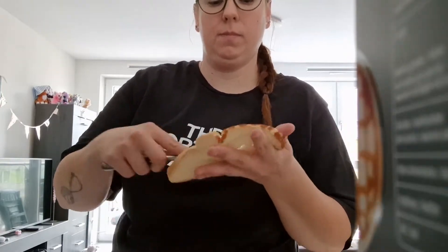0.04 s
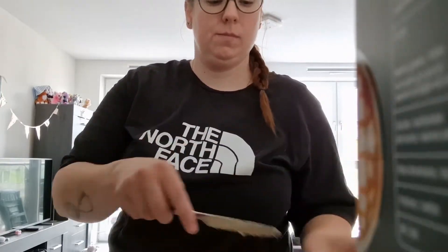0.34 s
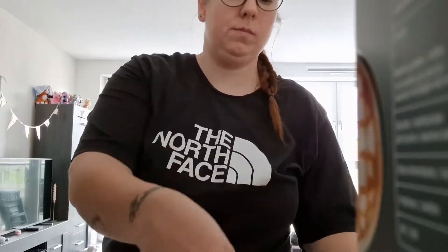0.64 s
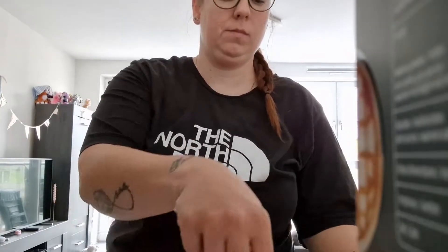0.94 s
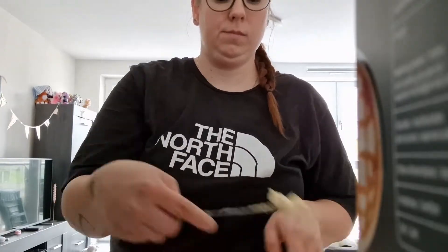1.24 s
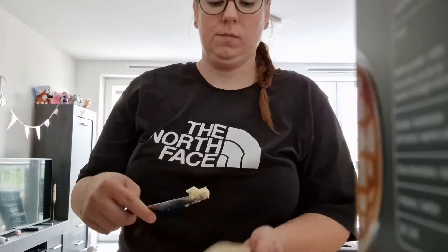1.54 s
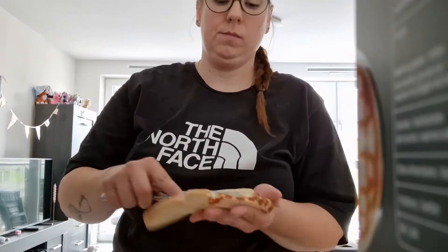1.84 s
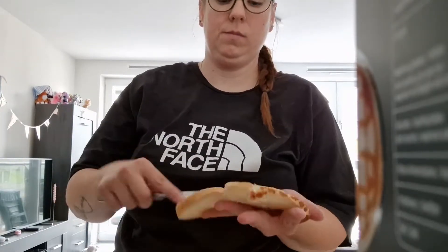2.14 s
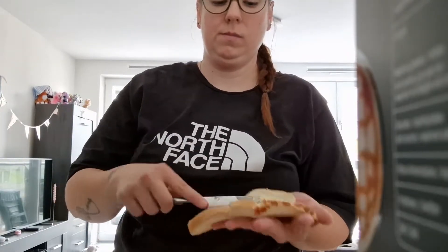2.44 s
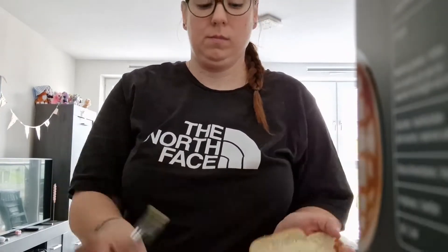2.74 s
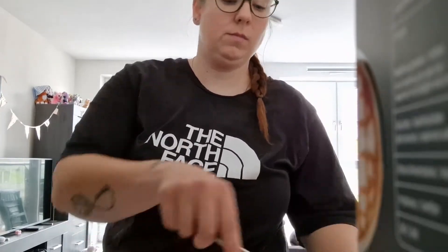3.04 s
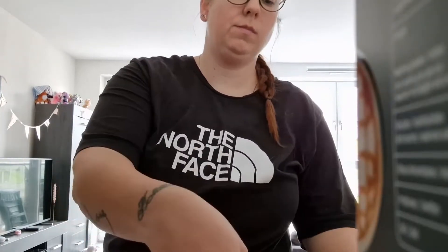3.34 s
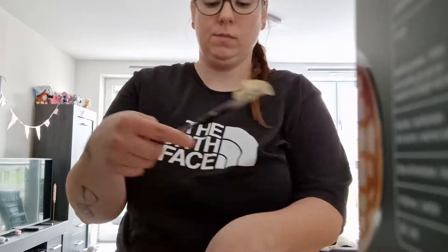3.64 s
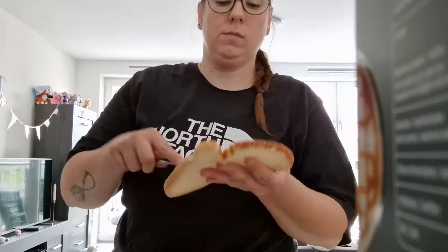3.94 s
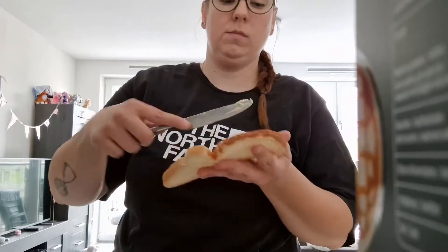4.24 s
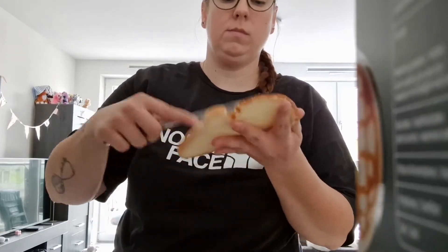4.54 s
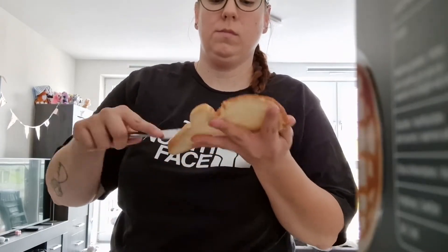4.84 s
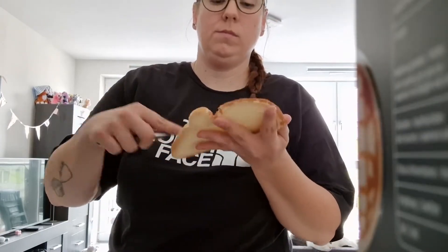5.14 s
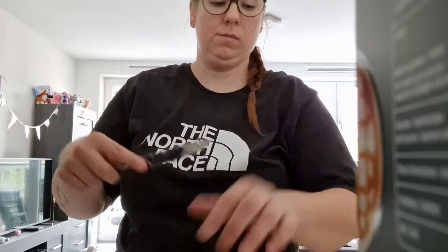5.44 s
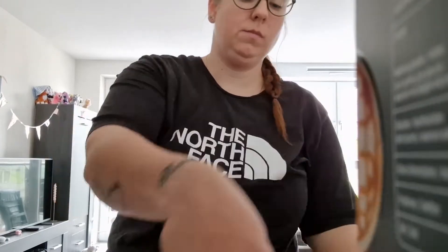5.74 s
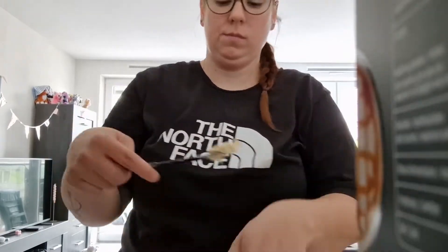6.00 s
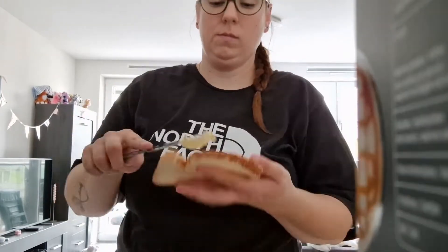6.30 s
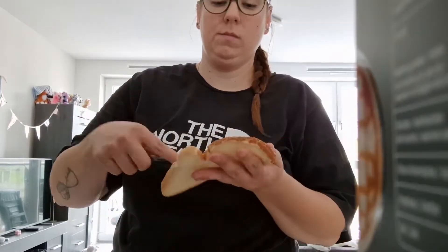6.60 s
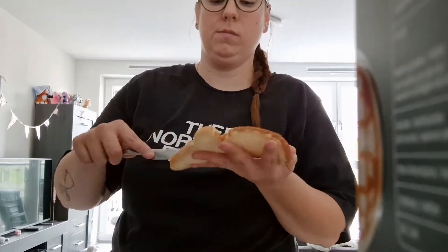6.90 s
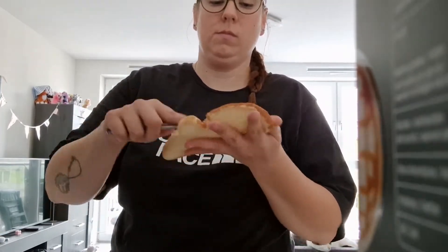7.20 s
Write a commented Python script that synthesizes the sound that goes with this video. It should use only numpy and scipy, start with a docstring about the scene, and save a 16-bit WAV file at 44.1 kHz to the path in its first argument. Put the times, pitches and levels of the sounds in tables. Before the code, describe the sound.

A knife softly spreads butter on bread in three spells, with knocks on a table and a plastic tub over a low room hum.

```python
"""A knife butters a slice of bread, swishing to and fro in three spells as it sticks and slips on crumbs.
It snags here and there, now and then rings, and digs in a plastic tub that knocks on the table top.
Sleeves and packaging rustle faintly over the low hum of a small room.
All this is heard through the two microphones of a phone standing on the same table."""
import sys
import numpy as np
from scipy import signal
from scipy.fft import rfft, irfft, next_fast_len
from scipy.io import wavfile
from scipy.ndimage import uniform_filter1d, minimum_filter1d

SR = 44100
rng = np.random.default_rng(int(sys.argv[2]) if len(sys.argv) > 2 else 0)


def wav_out(sig):
    """Save sig, one row per channel (or a flat mono array), as 16-bit PCM at SR to the path in sys.argv[1]."""
    wavfile.write(sys.argv[1], SR, np.round(np.clip(np.atleast_2d(sig).T, -1, 1) * 32767).astype(np.int16))


N = 324576
AGE = np.arange(int(.4 * SR)) / SR  # seconds since a short sound began
LEAD_S = .08  # the touch comes this far into each short sound
SINCE_TOUCH = AGE - LEAD_S


def undb(db):
    """Turn decibels (dB) into a number to multiply by."""
    return 10 ** (np.asarray(db) / 20)


def unit(x):
    """Scale a sound to an average power of 1."""
    return x / np.sqrt(np.mean(x ** 2) + 1e-30)


def burst(x, db):
    """Give a short sound the energy of 0.04 seconds at this level."""
    energy = np.mean(np.sum(x ** 2, axis=-1))
    return x * undb(db) * np.sqrt(.04 * SR / (energy + 1e-30))


def colour(x, points, share=1):
    """Shape the tone along a curve of (Hz, dB) points; share scales the dB values."""
    hz, db = np.transpose(points)
    size = next_fast_len(x.shape[-1])
    freqs = np.maximum(np.fft.rfftfreq(size, 1 / SR), 1)
    gain = undb(share * np.interp(np.log(freqs), np.log(hz), db))
    return irfft(rfft(x, size) * gain, size)[..., :x.shape[-1]]


def band(x, edges, order=2):
    """Keep what lies between two frequencies in Hz, without delaying it."""
    return signal.sosfiltfilt(signal.butter(order, edges, "band", fs=SR, output="sos"), x + 1e-18)


def wander(rate):
    """Drift between random values near zero, rate times a second."""
    targets = rng.standard_normal(4096)
    return 1.2 * np.interp(np.arange(N) / SR * rate, np.arange(4096), targets)


def swells(rows, rest_db):
    """A resting loudness with a bell-shaped rise for each row."""
    t = np.arange(N) / SR
    power = sum(undb(db) ** 2 * np.exp(-((t - s) / half) ** 2) for s, half, db in rows)
    return np.sqrt(undb(rest_db) ** 2 + power)


def add(out, s, x):
    """Mix in a short sound so that its touch falls at s seconds."""
    start = int((s - LEAD_S) * SR)
    a, b = max(start, 0), min(start + x.shape[-1], N)
    out[:, a:b] += x[..., a - start:b - start]


def fade(fade_s):
    """Die away by 60 dB in the fade time, fade_s seconds."""
    return undb(-60 * AGE / fade_s)


def ring(tones, damping=1):
    """A struck object sounds its own tones; more damping makes them fade sooner."""
    return sum(undb(db) * fade(fade_s / damping) * np.cos(2 * np.pi * hz * AGE)
               for hz, db, fade_s in tones)


def grains(size, rate, spread_db):
    """Tiny slips at random moments, about rate a second, a few much larger than the rest."""
    happens = rng.random(size) < rate / SR
    slips = happens * rng.standard_normal(size)
    return unit(slips * undb(spread_db * np.minimum(rng.exponential(size=size), 4)))


def click(blur_s, blur):
    """A sharp click blurred by a brief swell of noise before and after it; a longer blur is stronger."""
    swell = rng.standard_normal(len(AGE)) * np.exp(-np.abs(SINCE_TOUCH) / blur_s)
    pulse = swell / np.linalg.norm(swell) * (blur * blur_s) ** 2
    pulse[int(LEAD_S * SR)] += 1
    # even out the pitches, so the tone comes only from what is struck
    spectrum = rfft(pulse)
    power = uniform_filter1d(np.abs(spectrum) ** 2, size=15)
    return irfft(spectrum / np.sqrt(power + 1e-12), len(AGE))


def diffuse(points):
    """Noise from all round: alike at both microphones in the bass, unrelated in the treble."""
    # Each row: frequency in Hz, level in dB of the part that sets left and right apart.
    width = [(60, -17), (120, -23), (200, -13.0), (380, -7.5), (700, -1.5), (1300, 0.5)]
    middle, side = rng.standard_normal((2, N))
    side = colour(side, width)
    return unit(colour(np.array([middle + side, middle - side]), points))


def background(hum_db=-57.5, rumble_gain_db=-1, waver_db=0.5):
    """The room hums steadily, and the table top drones under the hands."""
    # The tone of the room and of the table. Each row: frequency in Hz, relative level in dB.
    hum_tone = [(15, -40), (25, -8), (123, -1.5), (190, -13), (309, -17.5), (463, -28.5), (607, -23.5),
                (818, -29), (911, -39.5), (1040, -34), (1400, -42), (4870, -51), (7310, -55), (8830, -66),
                (16000, -60)]
    rumble_tone = [(30, -15.5), (70, -14), (108, 13), (150, -0.5), (250, -18.5), (600, -23), (1200, -71.5)]
    # A hand leans on the table. Each row: middle and half length in seconds, level in dB before gain.
    leans = [(1.0, .5, -55), (2.8, .06, -54.5), (3.3, .18, -64), (5.82, 0.1, -54)]
    rumble = diffuse(rumble_tone) * swells(leans, rest_db=-62)
    rumble *= undb(rumble_gain_db + waver_db * wander(15))
    hum = diffuse(hum_tone) * undb(hum_db)
    return (hum + rumble) * undb([[.4], [-.4]])  # slightly louder on the left


def rustle(gain_db=-4, flicker_db=3):
    """Moving arms make sleeves and packaging crackle finely and unevenly."""
    # Arm movements. Each row: middle and half length in seconds, level in dB before gain.
    reaches = [(0.03, 0.13, -72.5), (1.28, 0.12, -79.5), (2.45, 0.028, -71), (2.84, .1, -73.5),
               (3.7, 0.23, -81.5), (6.02, 0.14, -80), (7.22, 0.13, -84)]
    # The tone of the crackle. Each row: frequency in Hz, relative level in dB.
    rustle_tone = [(500, -11.5), (1500, -2.5), (3000, -3.5), (5200, -2), (7500, -5.5), (9000, -16),
                   (15000, -16.5)]
    fibres = np.array([grains(N, rate=1100, spread_db=3) for _ in range(2)])
    crackle = unit(colour(fibres, rustle_tone)) * swells(reaches, rest_db=-97.5)
    return crackle * undb(gain_db + flicker_db * wander(42))


def taps(events, tones, blur):
    """Light touches set one small object ringing."""
    out, ringing = np.zeros((2, N)), ring(tones)
    for s, blur_s, db in events:
        tap = signal.fftconvolve(ringing, click(blur_s, blur))[:len(AGE)]
        add(out, s, burst(tap, db))
    return out


def knife_and_tub(rim_fade_s=.028, wall_damping=2.2):
    """The steel knife and the plastic tub ring only briefly, because hands hold them."""
    # The blade clinks, it catches the tub's rim, and the tub's wall snaps back.
    # Each row: time in seconds, blur time in seconds, level in dB.
    clinks = [(0.245, 0.0017, -74.5), (.312, 0.012, -72), (2.932, 0.0021, -91.5), (5.399, 0.0036, -61)]
    rim_touches = [(.242, 0.0053, -71.5), (.879, 0.012, -76), (2.7305, 0.0019, -33), (3.082, 0.0068, -61.5),
                   (3.604, 0.0011, -85), (6.358, 0.0083, -77.5)]
    snaps = [(.9905, 0.0016, -60)]
    # The knife's tones. Each row: pitch in Hz, relative level in dB, fade time in seconds.
    knife_tones = [(2060, -3, .11), (2940, 0, .08), (4010, -5, .05), (5220, -5, .035), (8130, -14, .03),
                   (9810, -12, .03)]
    # The rim's tones. Each row: pitch in Hz, relative level in dB.
    rim_peaks = [(1870, -12.5), (4730, -5.5), (5300, -2.5), (5580, 1), (5990, -13.5), (6790, -15.5),
                 (9760, -29.5)]
    # The wall's tones. Each row: pitch in Hz, width in Hz before damping, relative level in dB.
    wall_peaks = [(1470, 22, -31), (2380, 29, 2), (3120, 71, -31), (4260, 28, -1.5), (5270, 25, -8),
                  (6850, 57, -15), (8000, 100, -36), (9050, 68, -45)]
    rim_tones = [(hz, db, rim_fade_s) for hz, db in rim_peaks]
    # a wider peak fades sooner
    wall_tones = [(hz, db, np.log(1000) / (np.pi * width * wall_damping)) for hz, width, db in wall_peaks]
    knife = taps(clinks, knife_tones, blur=1000)
    rim = band(taps(rim_touches, rim_tones, blur=600), (1000, 13500), order=1)
    wall = taps(snaps, wall_tones, blur=750)
    return knife + rim + wall


def table_knocks(cloud_db=-12, rocking_db=-18, sway_hz=57):
    """Knife and tub knock on the table: it rings with a thud, a clack and a tick, and sways on its legs."""
    # Each row: time and blur time in seconds, thud pitch in Hz, thud level in dB,
    # how many dB the clack is below the thud, how many dB the tick is below the clack.
    blows = [(0.268, 0.0087, 125.5, -36, 9, 23.5), (0.594, 0.0093, 100, -46.5, 14.5, 21),
             (0.707, 0.019, 100, -46.5, 19, 33), (0.917, 0.0096, 100, -46, 25, 20),
             (1.1, 0.0053, 93, -46.5, 23.5, 8), (1.27, 0.0041, 171, -39.5, 15, 17.5),
             (1.4, 0.0076, 118, -41, 22, 28), (2.7307, 0.0026, 195, -13.5, 6, 16),
             (2.7515, 0.0025, 166, -26.5, 8.5, 21), (2.866, 0.0053, 176.6, -33.5, 11, 20),
             (2.93, 0.0029, 133.6, -55, 8.5, 30), (3.208, 0.0047, 97.4, -46.5, 14.5, 14),
             (3.352, 0.0086, 78.2, -34, 15.5, 22.5), (3.61, 0.00435, 151.4, -30, 9, 22.5),
             (5.399, 0.011, 146.9, -39.5, 14.5, 23.5)]
    # Tones of table and tub. Each row: pitch in Hz, relative level in dB, undamped fade time in seconds.
    table_tones = [(66.4, -19.5, 0.13), (112.6, -8.5, 0.18), (137.6, 1, 0.043), (207, -0.5, 0.039),
                   (263, -9.5, 0.14), (300, -13, 0.58), (369, -16.5, 0.16), (460, -25, 0.044),
                   (525, -16.5, 0.17), (633, -25.5, 0.033), (682, -19, 0.17), (696, -28, 0.15),
                   (918, -23.5, 0.027), (1260, -19.5, 0.024), (1300, -25.5, 0.13), (1581, -16, 0.045),
                   (1630, -22, 0.14), (1900, -33, 0.019), (2100, -28, 0.05), (2160, -30, 0.028),
                   (2480, -38.5, 0.04), (3100, -42.5, 0.0309), (3740, -33.5, 0.044), (4650, -35, 0.035),
                   (6400, -24.5, 0.0088), (6000, -39, 0.025), (7800, -36.5, 0.025)]
    # A cloud of many more short tones. Each row: frequency in Hz, relative level in dB.
    cloud_tone = [(100, -7.5), (350, 6.0), (700, 1), (1600, -10.5), (2200, -4), (4000, -13),
                  (5600, -20.0), (7500, -23.5), (9500, -29.5), (15000, -24.5)]
    # wood and plastic lose their higher tones quickly
    tones = [(hz, db, min(fade_s, .02 + 60 / hz)) for hz, db, fade_s in table_tones]
    # every other tone rocks the phone sideways, pushing its microphones opposite ways
    rocking = unit(band(ring(tones[1::2], damping=1.05), (260, 1100)))
    wood = unit(ring(tones, damping=1.05)) + undb(rocking_db) * rocking * np.array([[1], [-1]])
    after = np.maximum(SINCE_TOUCH, 0)
    sway = np.sin(2 * np.pi * sway_hz * after) * undb(-60 * after / .15)
    out = np.zeros((2, N))
    for s, blur_s, thud_hz, thud_db, clack_drop_db, tick_drop_db in blows:
        cloud = colour(rng.standard_normal((2, len(AGE))), cloud_tone) * fade(.097)
        body = wood + undb(cloud_db) * unit(cloud)
        hit = signal.fftconvolve(body, click(blur_s, blur=330)[None], axes=1)[:, :len(AGE)]
        thud = signal.filtfilt(*signal.iirpeak(thud_hz, Q=.97, fs=SR), hit + 1e-18)
        thud = np.roll(thud, int(.25 * SR / thud_hz))  # the heavy top answers a quarter cycle late
        cutoff_hz = np.clip(8.3 / blur_s, 300, 8000)  # a more blurred knock sounds duller
        clack = signal.sosfilt(signal.butter(2, cutoff_hz, fs=SR, output="sos"), hit + 1e-18)
        clack_db = thud_db - clack_drop_db
        thud = burst(band(thud, (50, 460), order=3), thud_db)
        clack = burst(band(clack, (2.05 * thud_hz, 2000), order=3), clack_db)
        tick = burst(band(hit, (2000, 7500), order=3), clack_db - tick_drop_db)
        sway_db = thud_db - 10.5 * np.log2(thud_hz / sway_hz)  # a higher thud stirs less sway
        add(out, s, thud + clack + tick + burst(sway, sway_db))
    return out


def strokes(press_db=2, half_length_s=.014):
    """The hand moves the blade to and fro in spells, each stroke a little different."""
    # Each row: first and last stroke in seconds, strokes per second, quickening from 0 to 1,
    # base level in dB, rise over the spell in dB, brightness in dB.
    spells = [(1.745, 2.55, 7.5, 0.01, -80.5, -7, 4), (3.923, 5.229, 7.6, 0.06, -81, 1, -0.5),
              (6.161, 7.056, 5.6, 0.23, -78.5, 7, 1)]
    rows = []
    for first, last, rate, quickening, db, rise_db, bright_db in spells:
        count = int(round((last - first) * rate)) + 1
        for progress in np.linspace(0, 1, count):
            s = first + (last - first) * (progress + quickening * progress * (1 - progress))
            pressure_db = press_db * np.sin(np.pi * progress)  # the hand presses harder mid-spell
            level_db = db + rise_db * (progress - .5) + pressure_db + rng.standard_normal()
            half_length = half_length_s * undb(2 * rng.standard_normal())
            rows.append((s, half_length, level_db, bright_db))
    return rows


def blade_scrapes(rasp_db=1, fizz_db=-11.5):
    """The blade sticks and slips over crumbs and plastic; each stroke or snag swells and fades."""
    # Snags on crust or tub. Each row: middle and half length in seconds, hiss level and brightness in dB.
    snags = [(0.112, 0.006, -81, 0), (0.268, 0.0069, -75, 9), (0.458, 0.015, -79, 0.5),
             (0.68, 0.01, -70.5, 0.5), (0.99, 0.0016, -69.5, -3), (1.107, 0.0045, -75, 7),
             (1.36, 0.045, -75, 1), (1.443, 0.0038, -80, 4), (1.511, 0.019, -80, 0.5),
             (2.012, 0.0017, -67.5, 11.5), (2.037, 0.0048, -71, 0), (2.155, 0.0032, -80, 8),
             (2.544, 0.0025, -82, 8), (2.893, 0.004, -72.5, 6), (2.963, 0.0026, -86, -5.5),
             (3.08, 0.0082, -68.5, 3), (3.341, 0.0079, -72, -1), (4.179, 0.0064, -78, 1.5),
             (4.591, 0.0045, -92, 12), (5.397, 0.0049, -67.5, 6), (5.821, 0.0047, -79.5, 2),
             (6.566, 0.003, -85, 7), (7.314, 0.008, -76, 2)]
    # The tone of rubbing. Each row: frequency in Hz, relative level in dB.
    rub_tone = [(590, 10), (1000, -3.5), (1230, -0.5), (1320, -17), (1440, -5), (1900, -11), (3300, -9.5),
                (6190, -13), (7270, -11.5), (8840, -18.5), (15500, -13.5)]
    # Low rasp, middle hiss and high fizz. Each row: lowest and highest frequency in Hz.
    ranges = [(1000, 3200), (3200, 8000), (8000, 15500)]
    out = np.zeros((2, N))
    for s, half_length, hiss_db, bright_db in strokes() + list(snags):
        slips = grains(len(AGE), rate=1200, spread_db=3.5) + .25 * rng.standard_normal((2, len(AGE)))
        slips /= np.cosh(np.clip(SINCE_TOUCH / half_length, -60, 60))  # swell and fade
        spot = rng.standard_normal((1, len(AGE))) * fade(.041)  # each rubbed spot has its own brief ring
        rub = colour(signal.fftconvolve(slips, spot, axes=1)[:, :len(AGE)], rub_tone)
        # a brighter scrape trades rasp for fizz
        levels = hiss_db + rasp_db - bright_db, hiss_db, hiss_db + fizz_db + bright_db
        add(out, s, sum(burst(band(rub, edges), db) for edges, db in zip(ranges, levels)))
    return out


def room_echo(x, echo_db=-24):
    """The walls add a short echo that grows duller as it fades."""
    noise = rng.standard_normal((2, len(AGE)))
    lows = band(noise, (60, 1500)) * fade(.17)
    highs = 1.3 * band(noise, (1500, 4000)) * fade(.12)
    tail = (lows + highs) * np.minimum(AGE / .0078, 1)
    tail = tail / np.linalg.norm(tail[0]) * undb(echo_db)
    return x + signal.fftconvolve(x, tail, axes=1)[:, :N]


def scene():
    """Mix everything; the work at the table reaches the left microphone a little earlier and brighter."""
    # Each row: frequency in Hz, how many dB louder the left is than the right.
    balance = [(100, -.8), (400, -.8), (1300, 3.5), (4500, 4), (9000, 1.5), (15000, 1.5)]
    left, right = room_echo(table_knocks() + blade_scrapes() + knife_and_tub())
    # the right lags by 0.17 ms; round the phone's body the lag levels off near a quarter cycle
    lag_radians = np.minimum(2 * np.pi * np.fft.rfftfreq(N, 1 / SR) * .00017, 1.5)
    right = irfft(rfft(right) * np.exp(-1j * lag_radians), N)
    work = np.array([colour(left, balance, share=.5), colour(right, balance, share=-.5)])
    return work + rustle() + background()


def record(dry, ceiling=.97, top_hz=15800):
    """The phone briefly turns down any peak above the ceiling, and cuts the highest treble."""
    window = int(.0015 * SR)
    gain = ceiling / np.maximum(np.abs(dry).max(axis=0), ceiling)
    gain = uniform_filter1d(minimum_filter1d(gain, window), window)
    return signal.sosfilt(signal.ellip(8, .2, 70, top_hz, fs=SR, output="sos"), dry * gain)


dry = scene()
out = record(dry)
wav_out(out)
```